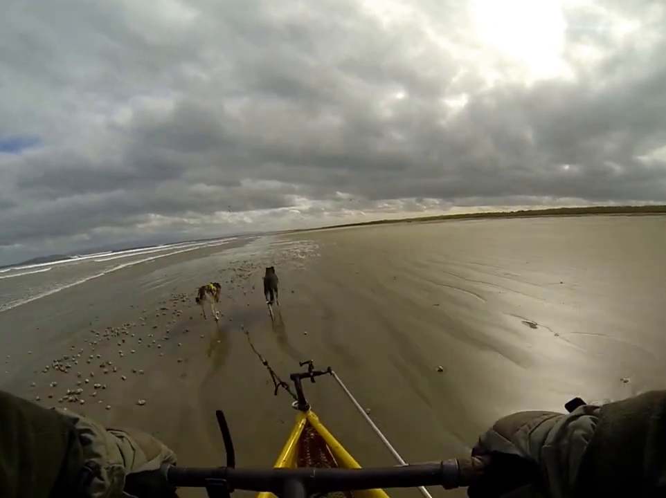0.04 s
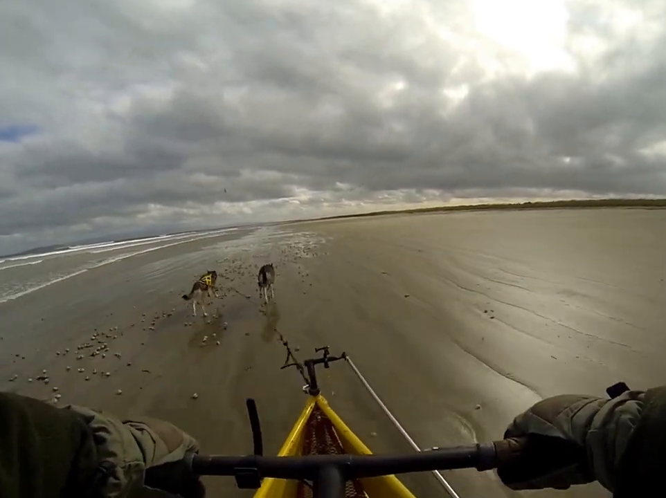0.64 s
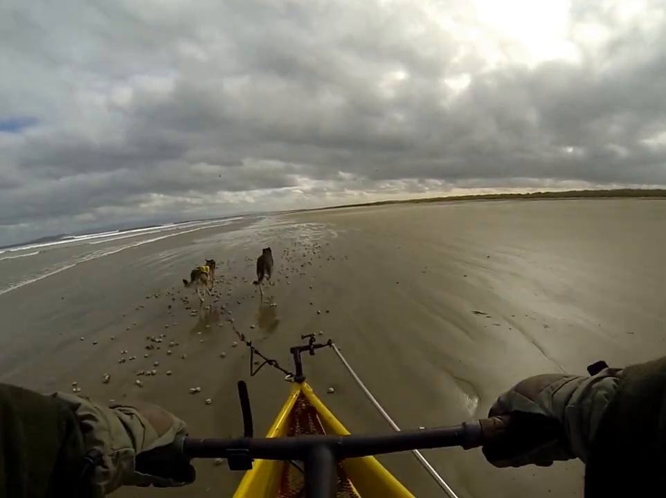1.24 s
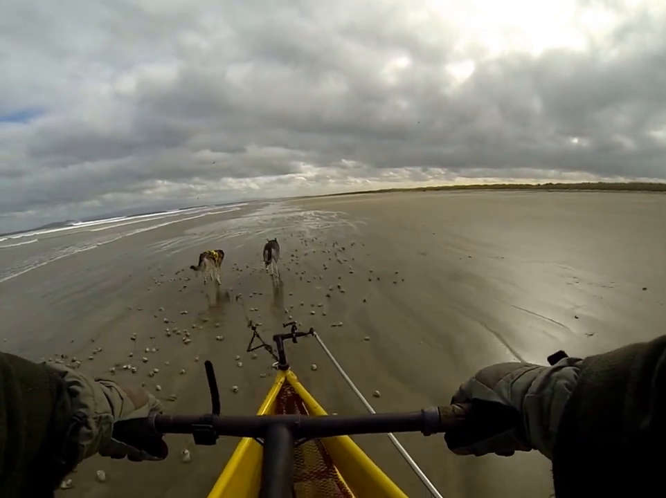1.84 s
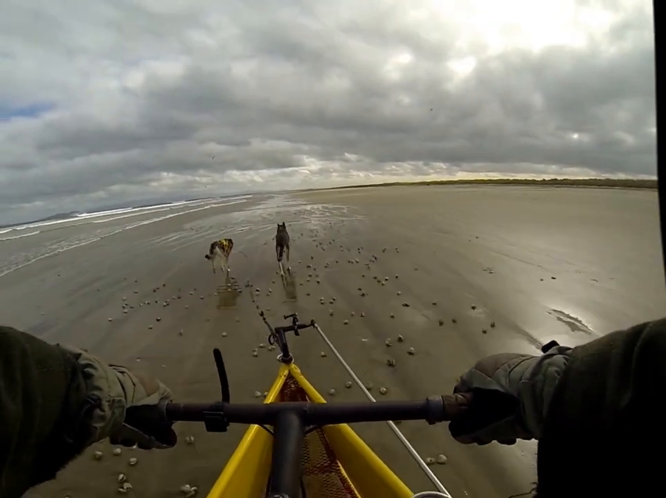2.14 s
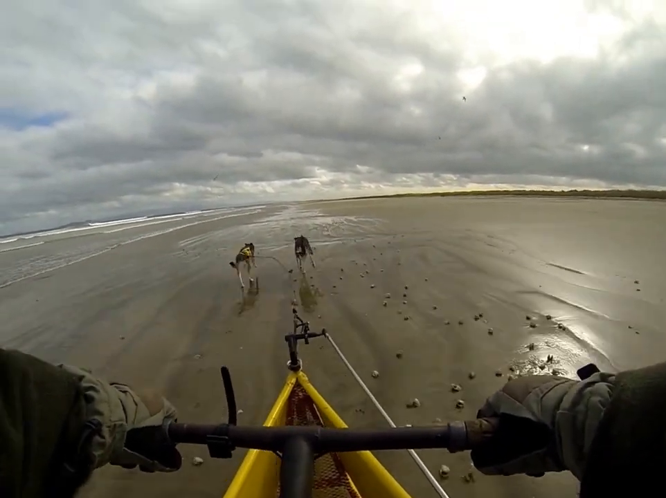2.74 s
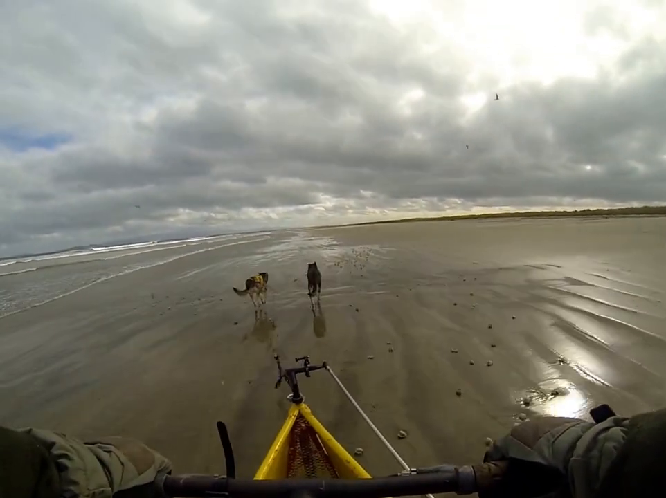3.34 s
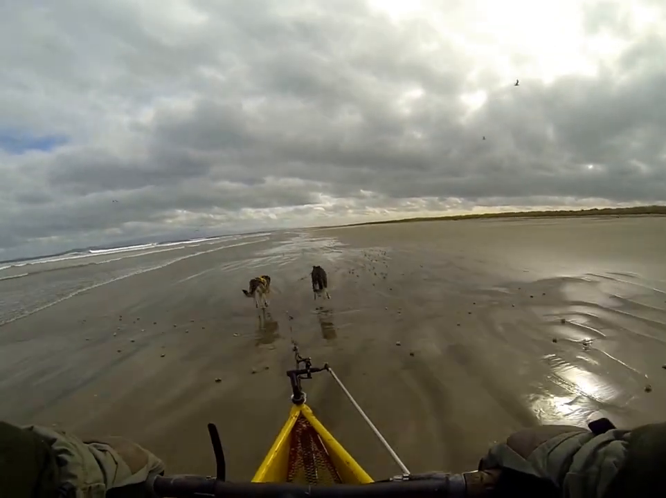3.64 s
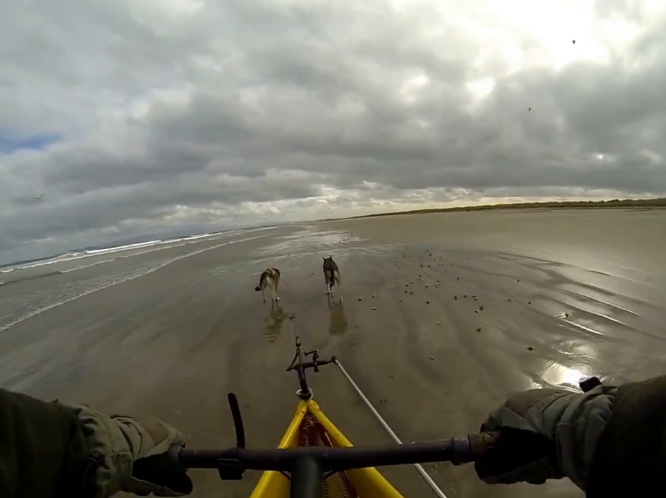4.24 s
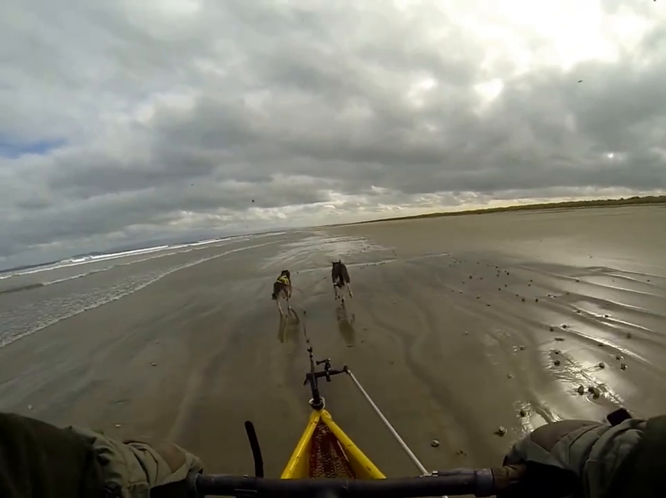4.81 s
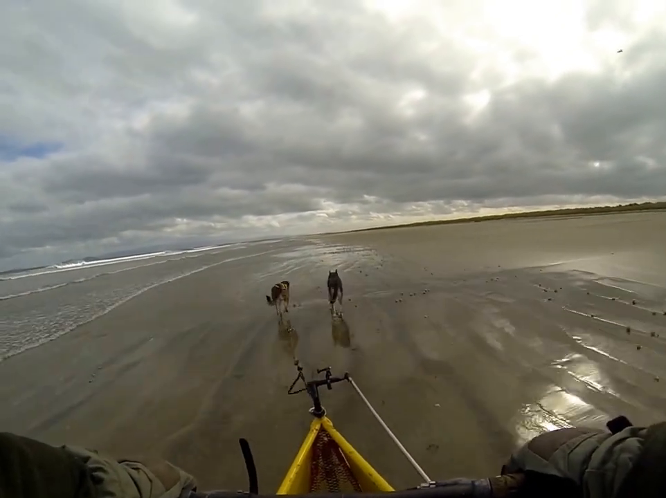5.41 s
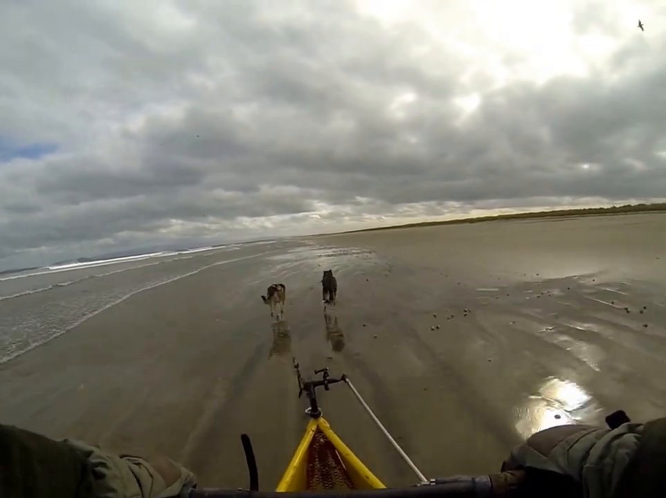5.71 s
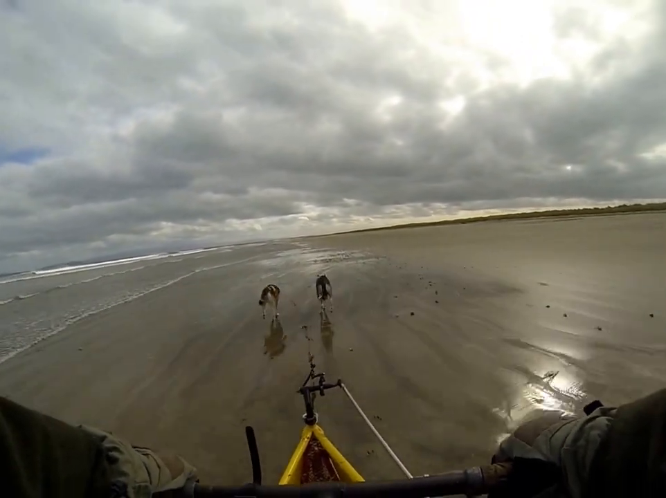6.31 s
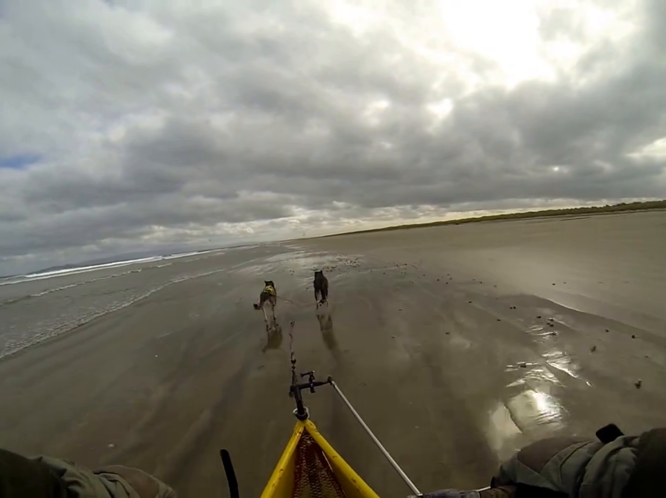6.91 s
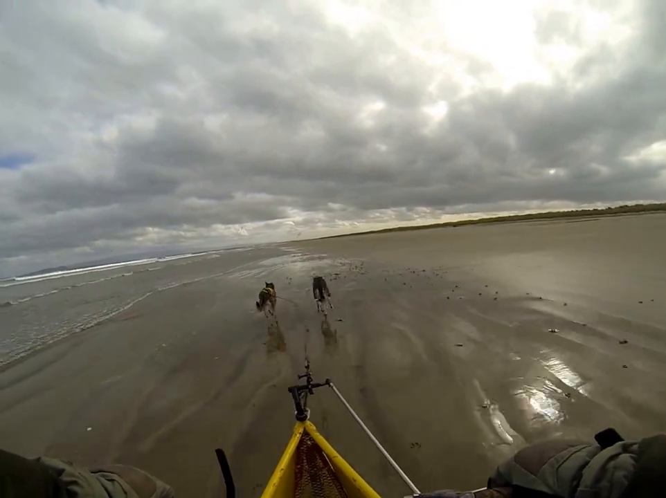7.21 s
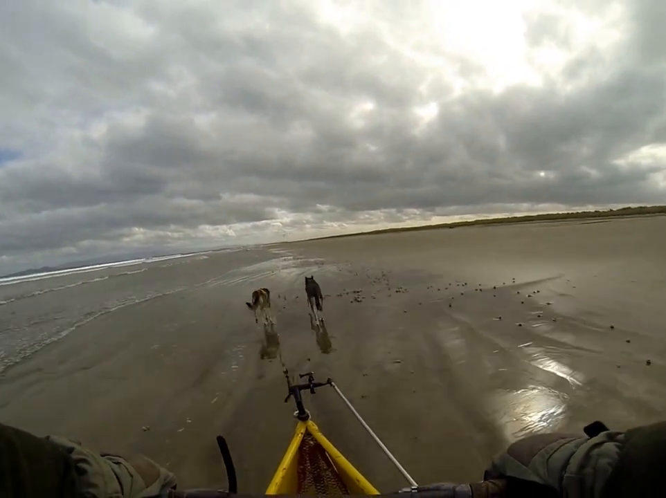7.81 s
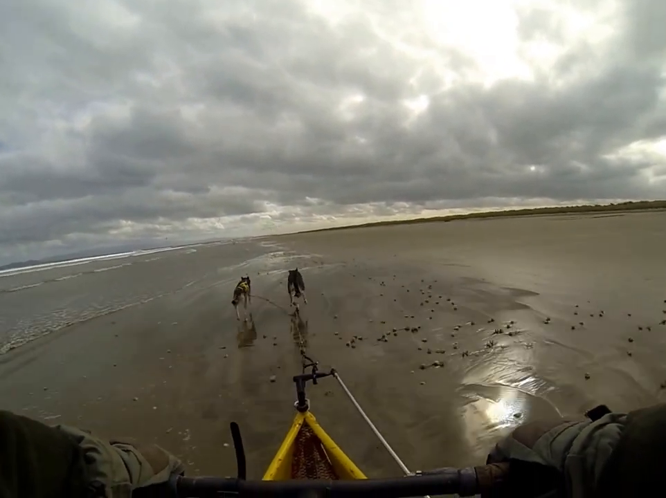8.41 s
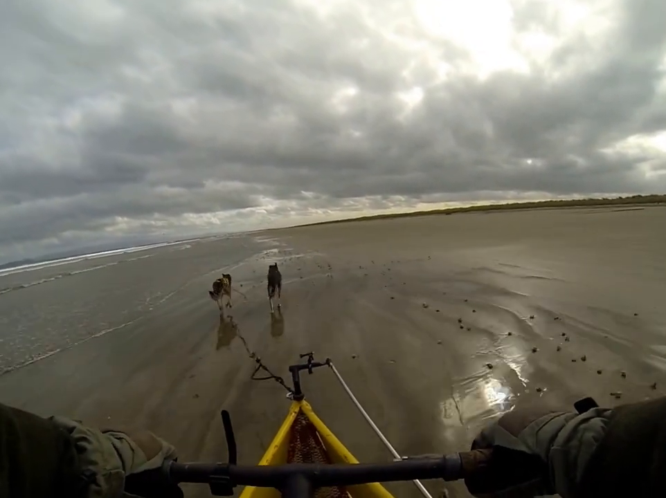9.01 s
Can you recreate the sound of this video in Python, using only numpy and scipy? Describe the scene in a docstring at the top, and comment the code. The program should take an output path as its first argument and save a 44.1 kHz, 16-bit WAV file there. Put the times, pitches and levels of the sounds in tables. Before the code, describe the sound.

From a microphone in a hard case riding on a wheeled rig, deep wind gusts thump over the soft grinding of tyres on wet sand. Loose fittings clack loudly and close by several times in the first half. Around the middle the rig jolts with dull thuds and crushes small shells. Afterwards the wind and rolling continue, with faint wet swishes and an occasional crunch or bump.

```python
"""Dog rig on wet sand.

Riding on a three-wheeled rig pulled by two dogs, the microphone inside a camera's hard case.
Air buffets the case; below it the frame rumbles, the tyres hiss and shells crunch under the wheels.
Loose fittings clack and ring the case near 1.5 kHz; the camera's electronics add a faint pulsed whine."""
import sys
import numpy as np
from scipy import signal
from scipy.fft import rfft, irfft
from scipy.io import wavfile
from scipy.ndimage import uniform_filter1d

SR = 44100
rng = np.random.default_rng(int(sys.argv[2]) if len(sys.argv) > 2 else 0)


def bounce(signal):
    """Save signal as a 16-bit WAV file at the path given by the first command-line argument."""
    frames = np.transpose(np.atleast_2d(signal))
    limited = np.clip(frames, -1, 1)
    pcm = np.round(limited * 32767).astype(np.int16)
    wavfile.write(sys.argv[1], SR, pcm)


N = 403515


def amp(db):
    """Decibels to gain."""
    return 10 ** (np.asarray(db) / 20)


def unit(x):
    """Scale to rms 1."""
    return x / np.sqrt(np.mean(x ** 2))


def add(out, at, x):
    """Mix x into out from a time in seconds."""
    i = max(int(at * SR), 0)
    out[i:i + len(x)] += x[:max(len(out) - i, 0)]


def curves(table):
    """Each column after a table's time column, sample by sample."""
    times, *columns = np.transpose(table)
    return [np.interp(np.arange(N) / SR, times, column) for column in columns]


def pulse(t, peak_s):
    """An envelope that rises to 1 at peak_s and dies away."""
    return t / peak_s * np.exp(1 - t / peak_s)


def walk(rate_hz):
    """Smooth random wander with a spread near 1."""
    hold = max(int(SR / rate_hz), 1)
    steps = rng.standard_normal(4096)[np.arange(N) // hold % 4096]
    return 1.35 * uniform_filter1d(uniform_filter1d(steps, hold), hold)


def grains(spread_db):
    """Dense tiny impacts of very uneven size."""
    return unit(rng.standard_normal(N) * amp(spread_db * np.minimum(rng.exponential(size=N), 2 * np.pi)))


def colour(x, points, size=16384):
    """Causal filter through (freq_hz, gain_db) points; white noise keeps its power."""
    hz, db = np.transpose(points)
    bins_hz = np.maximum(np.arange(size // 2 + 1) * SR / size, 1)
    gain = amp(np.interp(np.log(bins_hz), np.log(hz), db))
    cepstrum = irfft(np.log(gain))
    cepstrum[1:size // 2] *= 2
    cepstrum[size // 2 + 1:] = 0
    response = irfft(np.exp(rfft(cepstrum)))
    return signal.fftconvolve(x, response / np.linalg.norm(response))[:N]


def resonate(x, hz, q):
    """One resonance with gain 1 at its centre."""
    return signal.lfilter(*signal.iirpeak(min(hz, .45 * SR), q, fs=SR), x)


# Modes of the case around the microphone, and of its mount: pitch_hz, level_db, t60_s
CASE_RING = [(2212, -3.5, 0.055), (2310, 5.5, .02), (2493, 0, 0.035), (3059, -7, 0.053), (3645, -1, 0.041),
             (4120, 0, 0.023), (4350, -8, 0.024), (5050, 7, .02), (6470, 0, .03), (7600, -6, 0.049)]

def through_case(x, ring_db):
    """A sound passes through the case to the microphone and leaves the modes ringing."""
    t = np.arange(SR // 10) / SR
    ring = sum(amp(db - 60 * t / t60) * np.cos(2 * np.pi * hz * t) for hz, db, t60 in CASE_RING)
    ringing = signal.fftconvolve(x, ring / np.linalg.norm(ring))[:N]
    return (x + amp(ring_db) * ringing) / np.hypot(1, amp(ring_db))


# Air buffeting the case: freq_hz, gain_db
WIND_SPECTRUM = [(8, -23.5), (16, -1), (24, 1), (36, -3.5), (50, -13.5), (75, -19), (110, -30.5),
                 (200, -53), (500, -86.5)]
# Airflow between gusts: time_s, relative_db
AIRFLOW = [(0, -28.5), (0.45, -23), (0.8, -30), (1.15, -28.5), (1.65, -26.5), (2.3, -24.5), (3.5, -25.5),
           (3.97, -29.5), (4.3, -22.5), (4.75, -30.5), (5.2, -27), (5.42, -33), (5.78, -25), (6.15, -29.5),
           (7.0, -27), (8.15, -33.5), (8.65, -23.5), (9.15, -25.5)]
# Gusts, one eddy each: centre_s, peak_db, half_width_s
EDDIES = [(0.115, -9, 0.011), (1.832, -13, 0.0086), (2.074, -7, 0.0089), (2.703, -11, 0.018),
          (2.916, -10.5, 0.0083), (3.237, -6.5, 0.0092), (4.143, -6.5, 0.013), (4.499, -13.5, 0.011),
          (6.39, -13.5, 0.012), (6.521, -4.5, 0.011), (7.91, -14.5, 0.0071), (8.63, -11.5, 0.01),
          (9.044, -13, 0.013)]

def wind(swell_db=-13, swell_s=0.044):
    """Turbulence right on the case; each gust swells around an eddy that thumps it once."""
    t = np.arange(N) / SR
    breeze_db, = curves(AIRFLOW)
    air = colour(rng.standard_normal(N), WIND_SPECTRUM)
    air /= np.sqrt(uniform_filter1d(air ** 2, size=5000, mode="reflect"))  # even out the level
    swell = sum(amp(db + swell_db) * np.exp(-((t - at) / swell_s) ** 2 / 2) for at, db, _ in EDDIES)
    flutter_db = 1.3 * walk(11)
    air *= np.hypot(amp(breeze_db + flutter_db + 1), swell)
    for at, db, width in EDDIES:
        offset = (t - at) / width
        core = np.exp(-offset ** 2 / 2)
        air = air * (1 - core) - amp(db) * (1 - offset ** 2) * core
    return air


# Ground under the wheels, as relative levels: time_s, frame_db, tread_db
SAND_TRACK = [(0.0, -55, -50.5), (1.55, -53, -50), (1.91, -51, -45), (2.29, -55, -48.5), (3.16, -49.5, -49),
              (3.36, -55, -51.5), (4.48, -50.5, -46.5), (5.3, -54.5, -50), (5.56, -52.5, -51.5),
              (5.99, -56, -49.5), (7.59, -51.5, -49.5), (7.98, -55, -53), (9.15, -56, -51)]
# Wetness of the sand, as a relative level: time_s, spray_db
WETNESS = [(0.0, -58), (1.6, -61.5), (1.99, -55), (2.16, -58), (3.72, -58), (4.13, -56.5), (5.27, -60),
           (6.47, -58), (8.15, -61.5), (9.15, -59)]
# Frame, camera mount, tread and flung sand, heard from on board: freq_hz, gain_db
FRAME_SPECTRUM = [(50, -5), (110, 6.5), (160, 1), (240, -4.5), (340, -6.5), (500, -11.5), (750, -13.5),
                  (1000, -14.5), (1900, -43), (4000, -58)]
MOUNT_SPECTRUM = [(800, -39), (1050, -11), (1260, 3), (1400, 0), (1650, -7.5), (2000, -40)]
TREAD_SPECTRUM = [(900, -47), (1150, -13), (1400, 2.5), (1600, 1.5), (1720, -8.5), (1880, -15.5),
                  (2100, -17), (2450, -12), (2900, -20), (4000, -62.5)]
SPRAY_SPECTRUM = [(1700, -12.5), (2300, 3), (3200, 4), (3900, -3.5), (5100, -4.5), (5800, -6.5),
                  (7000, -9.5), (9500, -18.5), (12000, -16), (15000, -58)]

def rolling():
    """The frame rumbles and shakes the mount; the tread grinds on packed sand and flings wet grains."""
    frame_db, tread_db = curves(SAND_TRACK)
    spray_db, = curves(WETNESS)
    shake_db = frame_db + 0.49 * walk(20)
    frame = colour(grains(spread_db=3.5), FRAME_SPECTRUM) * amp(shake_db + 5)
    mount = colour(grains(spread_db=3.5), MOUNT_SPECTRUM) * amp(shake_db + 3.06 * walk(30))
    scrape = walk(35)  # tread and spray flicker together
    tread = colour(grains(spread_db=3), TREAD_SPECTRUM) * amp(tread_db + 1.57 * scrape - 2.26)
    flung = through_case(grains(spread_db=3), ring_db=-10)
    spray = colour(flung, SPRAY_SPECTRUM) * amp(spray_db + 0.97 * scrape - 4.17)
    return frame + mount + tread + spray


def whine(pitch_hz=12882, rate_hz=47.95, level_db=-75.5, duty=0.5):
    """Beside the microphone, the camera's electronics sing in one short burst for each picture."""
    t = np.arange(N) / SR
    bursts = uniform_filter1d(1. * (t * rate_hz % 1 < duty), size=50)
    tone = np.sin(2 * np.pi * pitch_hz * t + .9 * walk(50))
    return amp(level_db) * unit(bursts * tone * amp(1.2 * walk(60)))


# Large shells crushed under a tyre: start_s, relative_db, length_s, pitch_hz
CRUSHED_SHELLS = [(0.009, -52.5, .012, 4450), (0.098, -46.5, 0.024, 4540), (0.699, -52, 0.021, 5530),
                  (1.011, -51, 0.011, 5500), (1.09, -56, 0.017, 2760), (1.274, -54, 0.011, 2300),
                  (1.345, -52.5, 0.024, 3200), (1.761, -29, 0.008, 4580), (1.896, -49, .017, 3660),
                  (2.198, -46, 0.0046, 6560), (2.313, -51.5, 0.0074, 3630), (2.533, -46.5, 0.014, 7950),
                  (2.576, -47, .02, 2580), (2.804, -49, 0.01, 4980), (3.215, -52, 0.018, 4070),
                  (3.762, -50, 0.032, 4440), (3.872, -48, .016, 3620), (3.956, -49, .018, 3790),
                  (4.023, -40.5, 0.015, 3780), (4.191, -43, 0.0083, 5460), (4.359, -36, 0.022, 4000),
                  (4.42, -36, 0.016, 4400), (4.627, -41, 0.01, 6200), (4.797, -38.5, 0.0091, 7450),
                  (4.968, -50.5, 0.02, 3270), (5.534, -50, 0.011, 3330), (5.904, -43.5, 0.021, 3740),
                  (6.328, -51, 0.021, 5240), (6.466, -52, 0.022, 5800), (6.581, -48, .01, 5600),
                  (6.616, -45, 0.013, 3270), (7.895, -50.5, 0.015, 2300), (8.418, -41.5, 0.011, 4180),
                  (8.512, -54, .011, 5500), (8.594, -48, 0.018, 3180), (8.959, -52, .014, 2680)]
# Their crunch from inside the case: freq_hz, gain_db
CRUNCH_SPECTRUM = [(500, -22), (1000, -20), (1480, 12.5), (1900, -13), (2350, 3.5), (3300, 4), (4000, -7.5),
                   (5300, -5), (7500, -11.5), (10000, -19), (15000, -35)]

def shells(tail_db=-22, tail_s=0.065, grind_db=-31, grind_s=0.013):
    """Each shell collapses in a rush of tiny fractures that ring it; the tread grinds over the bits."""
    t = np.arange(SR // 5) / SR
    crunches, grind = np.zeros(N), np.zeros(N)
    fractures = unit(grains(spread_db=3.5) * amp(2.5 * walk(400)))
    fractures = np.resize(fractures, N + len(t))
    for at, db, length, hz in CRUSHED_SHELLS:
        rise = 1 - np.exp(-t / (0.23 * length))
        fall = np.exp(-(t / length) ** 2 / 2) + amp(tail_db) * np.exp(-t / tail_s)
        burst = rise * fall * fractures[int(at * SR):][:len(t)]
        ring = amp(4) * hz / 4000 * resonate(burst, hz, q=5)  # small shells ring higher and more clearly
        add(crunches, at, amp(db - 2.5) * (burst + ring))
        add(grind, at, amp(grind_db + 0.35 * db) * pulse(t, grind_s))
    crunch = colour(through_case(crunches, ring_db=-7), CRUNCH_SPECTRUM)
    return crunch + grind * colour(grains(spread_db=3.5), TREAD_SPECTRUM)


# Drifts of broken shell along the way: start_s, end_s
SHELL_DRIFTS = [(1.0, 2.9), (3.5, 4.9)]

def grit(count=90, level_db=-56.5, decay_s=0.014, drift_extra=3):
    """Bits of shell tick faintly under the wheels, each at its own pitch, thickest in the drifts."""
    t, clock = np.arange(SR // 15) / SR, np.arange(N) / SR
    in_drift = sum((clock > start) & (clock < end) for start, end in SHELL_DRIFTS)
    passed = np.cumsum(1 + drift_extra * in_drift)
    ticks = np.zeros(N)
    for when, pitch, size in rng.random((count, 3)):
        tick = unit(resonate(rng.standard_normal(len(t)), hz=2400 * 2.4 ** pitch, q=5))
        at = np.searchsorted(passed, when * passed[-1]) / SR
        add(ticks, at, amp(level_db - 0.8 * np.log(1.03 - size)) * tick * np.exp(-t / decay_s))
    return signal.sosfilt(signal.butter(2, 7000, fs=SR, output="sos"), ticks)


# Wet patches in the sand: centre_s, level_db, half_width_s
WET_PATCHES = [(.39, -63.5, 0.053), (6.03, -62, 0.057), (6.44, -57, 0.021), (6.9, -58.5, 0.049),
               (7.44, -62.5, 0.036), (8.36, -64.5, 0.056)]
# Water leaving the tyres: freq_hz, gain_db
SWISH_SPECTRUM = [(1800, -50), (2800, 13), (6500, 2), (8500, -2), (10000, -14), (12000, -10), (15000, -10)]

def swishes():
    """A film of water sprays off the tyres, swelling and fading."""
    t = np.arange(N) / SR
    flow = sum(amp(db) * np.exp(-((t - at) / width) ** 2 / 2) for at, db, width in WET_PATCHES)
    droplets = grains(spread_db=5.5) * amp(1.3 * walk(82))
    return flow * colour(droplets, SWISH_SPECTRUM)


# Dull thuds and knocks of the rig, from bumps and under the heavy clacks: start_s, thud_db, knock_db
JOLTS = [(0.352, -30, -52), (0.431, -29.5, -63), (1.202, -34, -40), (1.758, -33, -32.5),
         (2.439, -44, -36.5), (2.485, -51, -41), (2.699, -25.5, -45), (3.043, -33, -38.5),
         (3.269, -45, -40.5), (4.256, -29, -39.5), (4.358, -31, -66), (4.432, -28.5, -40),
         (4.576, -27.5, -39.5), (4.74, -24, -40.5), (6.611, -28, -52), (6.784, -28, -67), (8.671, -25, -55)]

def jolts(thud_hz=90, thud_s=0.0077, knock_s=0.006):
    """Each jolt gives the frame one damped thud and the case a dull, rough knock."""
    t = np.arange(SR // 6) / SR
    thuds, knocks = np.zeros(N), np.zeros(N)
    for (at, thud_db, knock_db), detune in zip(JOLTS, rng.standard_normal(len(JOLTS))):
        tone = np.sin(2 * np.pi * thud_hz * (1 + 0.16 * detune) * t)
        add(thuds, at, amp(thud_db) * pulse(t, thud_s) * tone)
        add(knocks, at, amp(knock_db) * pulse(t, knock_s))
    case_body = [(80, -3), (170, 3.5), (380, -3.5), (900, -13.5),  # freq_hz, gain_db
                 (1270, 5.5), (1600, -8), (2000, -22), (5000, -60)]
    return thuds + colour(knocks * grains(spread_db=2.5), case_body)


FITTINGS = [(0.4731, -31, -38.5, 5000, 0.0065), (1.2016, -45, -37, 5230, None),
            (1.7478, -9.5, -31, 5150, 0.014), (1.8778, -24.5, -35, 2500, None),
            (1.9993, -14.5, -35.5, 8100, None), (2.0192, -24, -34, 2700, None),
            (2.0622, -18.5, -36, 3240, 0.0075), (2.075, -23.5, -34.5, 5200, 0.011),
            (2.1453, -19.5, -37, 5040, None), (2.4246, -17.5, -35, 2600, .005),
            (2.443, -17.5, -32.5, 4900, None), (2.483, -26, -34, 2600, None),
            (2.4879, -20.5, -26.5, 2680, .011), (3.478, -19, -33.5, 2760, .0205)]
# Their crack from inside the case: freq_hz, gain_db
CRACK_SPECTRUM = [(120, 0), (300, 6.5), (700, 0.5), (950, -11), (1500, -10), (1950, 2.5), (2500, 2.5),
                  (3400, -1.5), (4200, -15), (5200, -7.5), (7500, -11.5), (10500, -22), (15000, -25)]

def clacks(ring_hz=1510, tail_hz=1400, build_s=0.0025, tail_s=0.018, crack_s=0.0038):
    """A fitting strikes with a short crack; the blow travels up the mount and briefly rings the case."""
    t = np.arange(SR // 12) / SR
    rings, cracks = np.zeros(N), np.zeros(N)
    swell = pulse(t, build_s) ** 3
    tail = amp(-22) * np.exp(-t / tail_s) * (1 - np.exp(-t / build_s))
    snap = np.exp(-t / crack_s) * (1 - np.exp(-t / 0.00076))
    strikes = [row[:4] for row in FITTINGS]
    rebounds = [(at + gap, ring_db - 3, crack_db - 6.5, hz)  # softer and duller
                for at, ring_db, crack_db, hz, gap in FITTINGS if gap]
    for at, ring_db, crack_db, fitting_hz in strikes + rebounds:
        main_hz, after_hz = np.array([ring_hz, tail_hz]) * (1 + .04 * rng.uniform(-1, 1, 2))
        ring = swell * np.sin(2 * np.pi * main_hz * t) + tail * np.sin(2 * np.pi * after_hz * t)
        add(rings, at, amp(ring_db) * ring)
        contact = snap * rng.standard_normal(len(t))
        add(cracks, at, amp(crack_db + 1.5) * (contact + amp(6) * resonate(contact, fitting_hz, q=5)))
    return rings + colour(through_case(cracks, ring_db=-10.5), CRACK_SPECTRUM)


def scene():
    """All sources at the one microphone riding on the rig."""
    rig = rolling() + swishes() + jolts() + shells() + grit()
    return (wind() + rig + clacks() + whine())[None]


def record(dry):
    """The camera cuts the treble steeply above 15 kHz."""
    return signal.sosfilt(signal.ellip(8, .2, 70, 15000, fs=SR, output="sos"), dry)


dry = scene()
out = record(dry)
bounce(out)
```